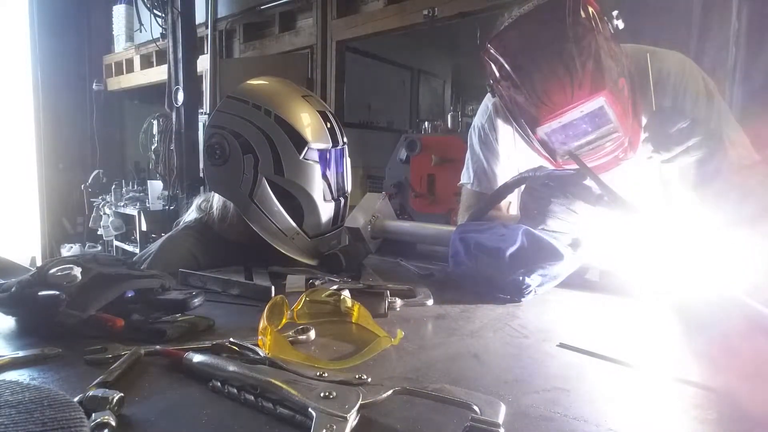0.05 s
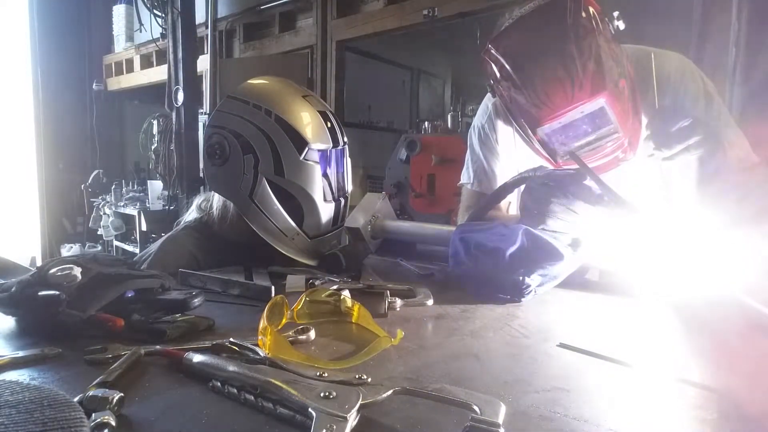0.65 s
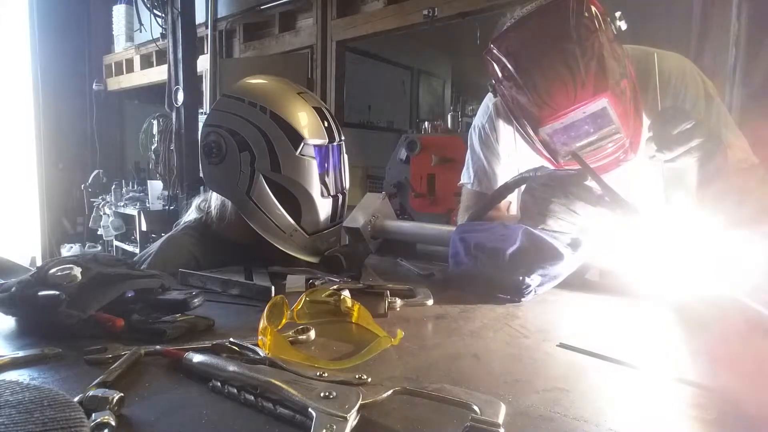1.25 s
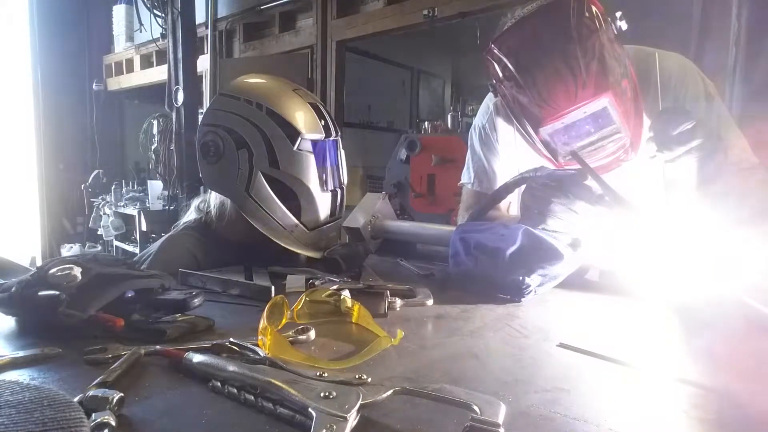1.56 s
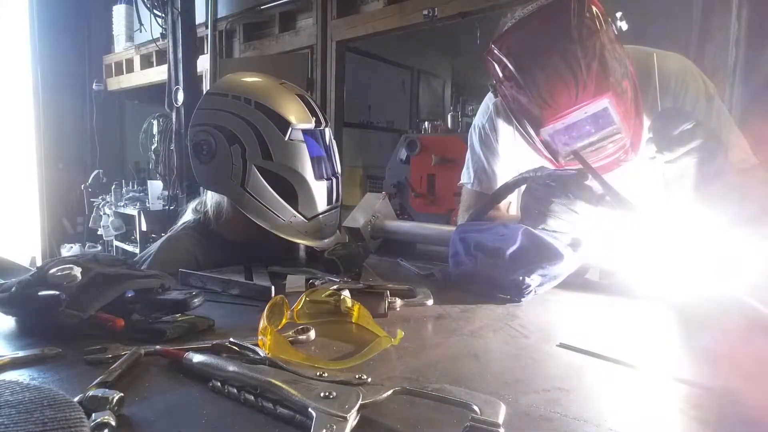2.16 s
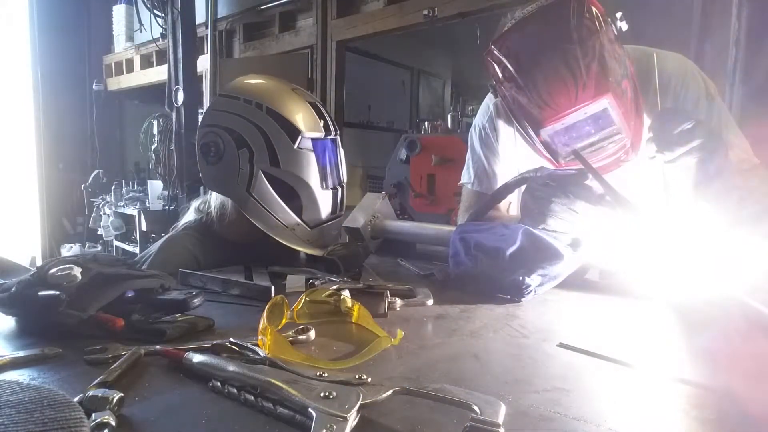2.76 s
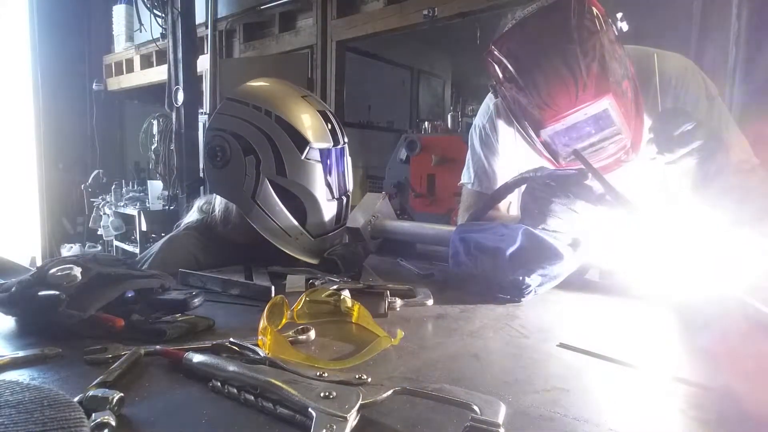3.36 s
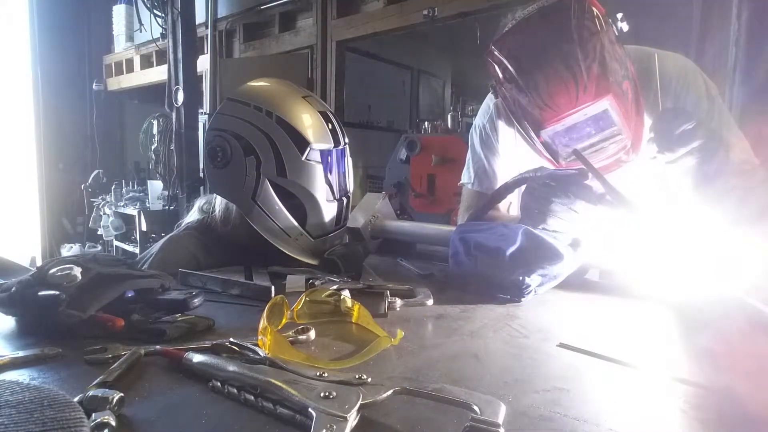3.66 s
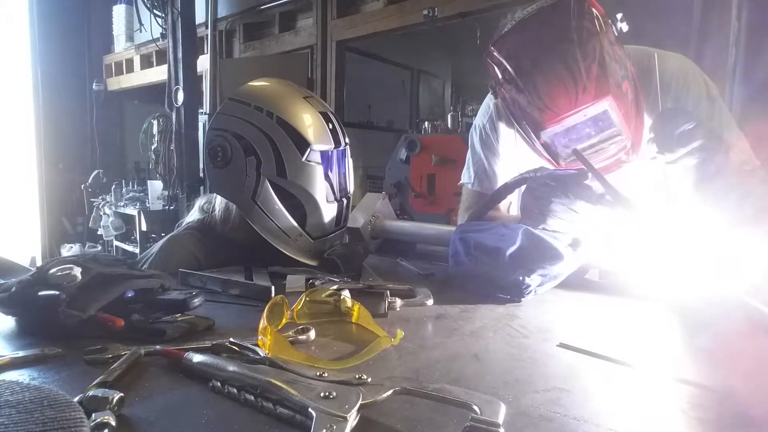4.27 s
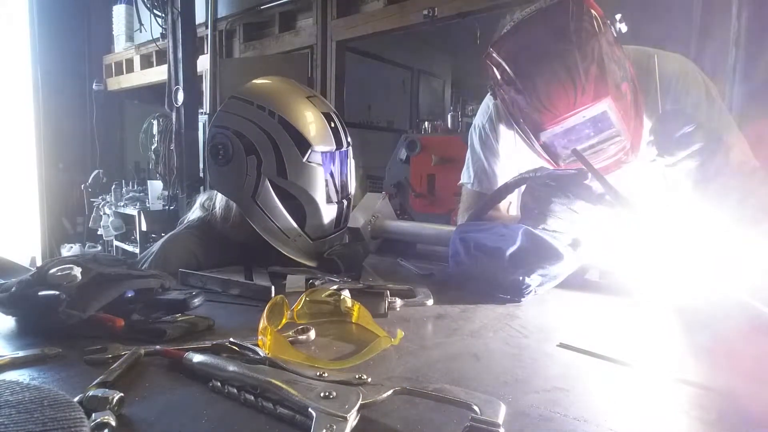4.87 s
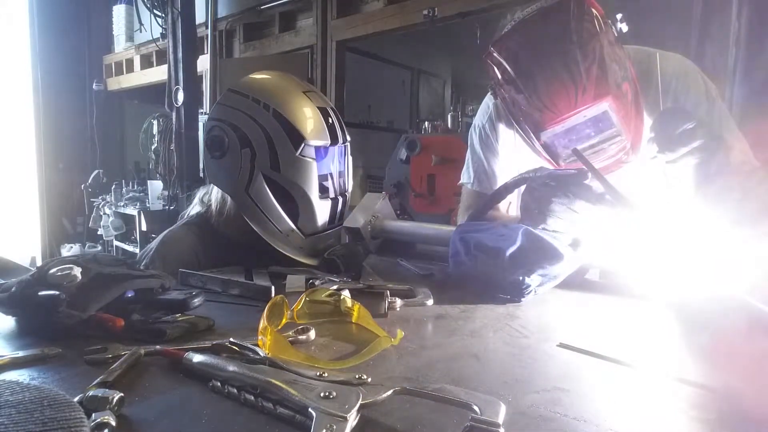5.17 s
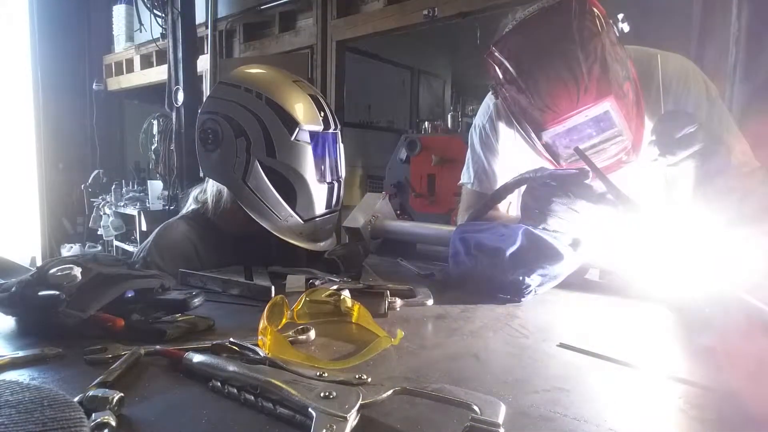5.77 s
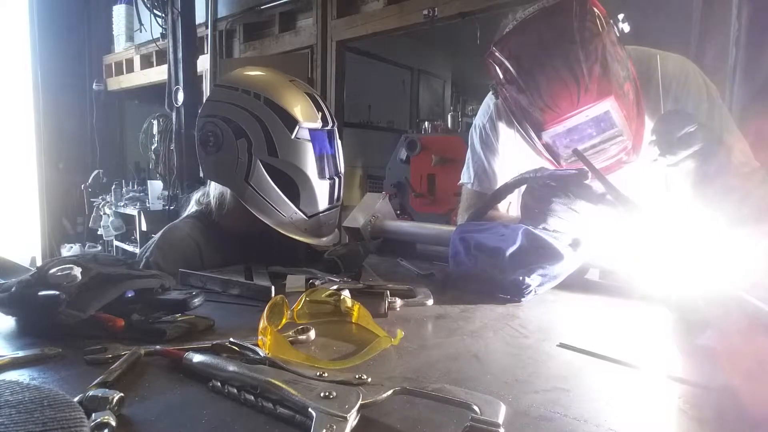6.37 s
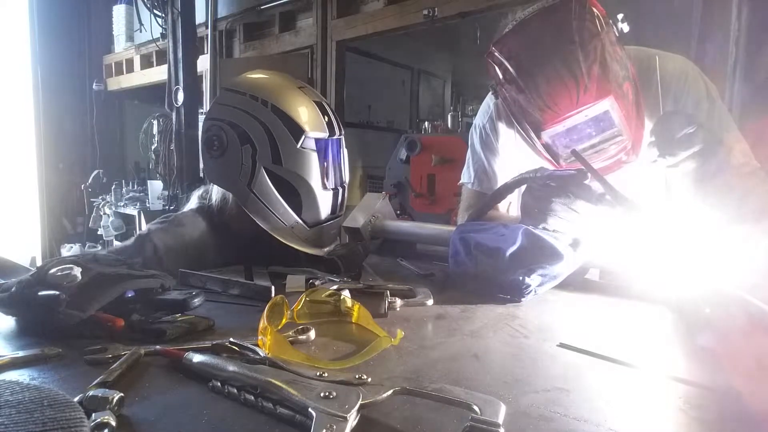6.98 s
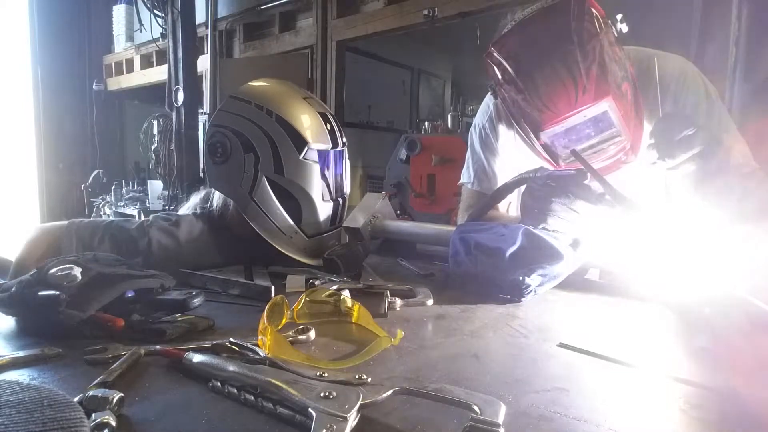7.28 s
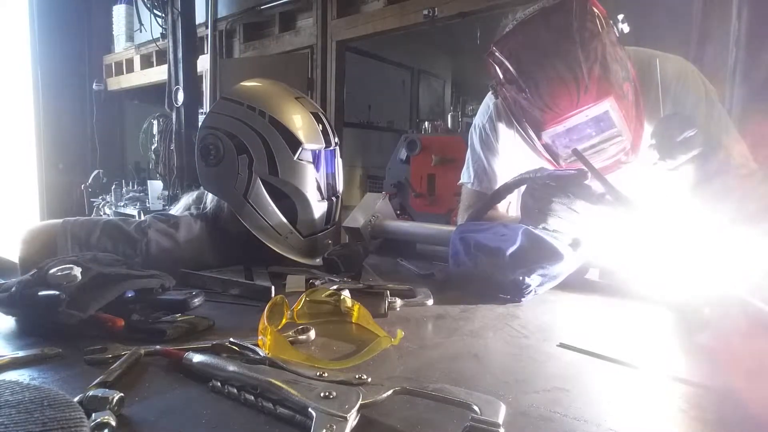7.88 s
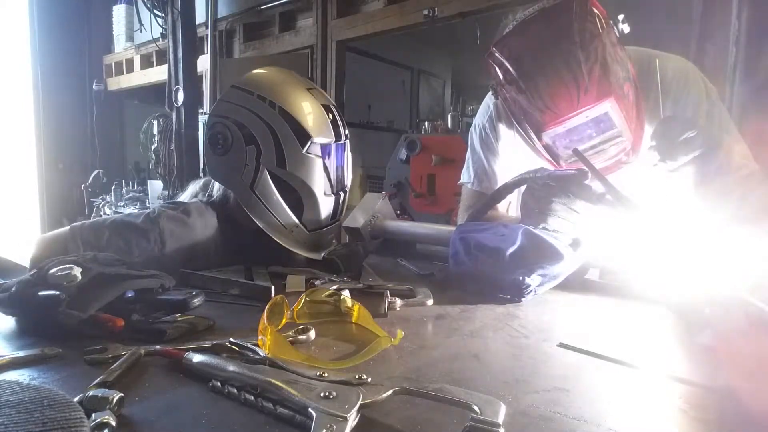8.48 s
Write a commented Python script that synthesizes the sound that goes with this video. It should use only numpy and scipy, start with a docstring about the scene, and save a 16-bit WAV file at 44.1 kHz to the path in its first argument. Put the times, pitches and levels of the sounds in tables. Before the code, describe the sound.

Close, continuous arc welding on a steel bench: a hard crackling buzz with hiss, small pops and a thin metallic whine.

```python
"""A hard, snapping buzz: an AC TIG arc on a steel workshop bench, close to a small stereo microphone.
Twice in every mains cycle a volley of starter sparks snaps and the arc relights with a puff; between
the two the oxide skin sizzles. The arc rasps when drawn long and sputters over dirty patches, and the
sparks set the workpiece whining. Echoes off the bench and the room shift as the torch creeps along.
Behind it the welder hums, a fan drones and the bench takes two soft knocks."""
import sys
import numpy as np
from scipy import signal
from scipy.fft import rfft, irfft, next_fast_len
from scipy.io import wavfile

SR = 44100
rng = np.random.default_rng(int(sys.argv[2]) if len(sys.argv) > 2 else 0)


def dump(signal):
    """Clip the signal to [-1, 1] and save it as 16-bit WAV at the path in sys.argv[1]."""
    limited = np.clip(np.atleast_2d(signal).T, -1, 1)
    pcm = np.round(limited * 32767).astype(np.int16)
    wavfile.write(sys.argv[1], SR, pcm)


N = 375732
TIME = np.arange(N) / SR
SIZE = next_fast_len(N + SR // 4, real=True)
HZ = np.fft.rfftfreq(SIZE, 1 / SR)
MAINS_HZ, CLEANING_MS = 60.009, 6.33  # each cycle cleans the metal this long, then heats it


def from_db(db):
    """Decibels to gain."""
    return 10 ** (np.asarray(db) / 20)


def rms_one(x):
    """Scale to rms 1."""
    return x / np.sqrt(np.mean(np.abs(x) ** 2) + 1e-20)


def read(rows, at):
    """Each column of a table, joined by straight lines."""
    key, *columns = np.transpose(rows)
    return [np.interp(at, key, c) for c in columns]


def spectrum(points):
    """A table joined on a log-frequency axis."""
    hz, value = np.transpose(points)
    return np.interp(np.log(HZ + 1), np.log(hz), value)


def spells(rows, at, ease_s=0.063):
    """Each row's amounts hold from its start to its end, easing in and out."""
    start, end, *amounts = np.transpose(rows)
    inside = np.minimum(at[:, None] - start, end - at[:, None])
    return [np.clip(.5 + inside / ease_s, 0, 1) @ amount for amount in amounts]


def shaped(x, response):
    """Pass a sound through a frequency response."""
    return irfft(rfft(x, SIZE) * response, SIZE)[..., :N]


def colour(x, db):
    """Causal (minimum-phase) filter with this dB curve, keeping the power of white noise."""
    cepstrum = irfft(np.log(rms_one(from_db(db))), SIZE)
    cepstrum[1:SIZE // 2] *= 2
    cepstrum[SIZE // 2 + 1:] = 0
    return shaped(x, np.exp(rfft(cepstrum)))


def resonance(hz, width_hz):
    """Frequency response of one ringing mode, gain 1 on top."""
    return 1 / (1 + 2j * (HZ - hz) / width_hz)


def clicks(seconds, db, size=8):
    """Clicks placed between the samples."""
    out, at = np.zeros(N), seconds[:, None] * SR
    taps = np.floor(at).astype(int) + np.arange(1 - size, size + 1)
    pulses = from_db(db)[:, None] * np.sinc(taps - at) * np.sinc((taps - at) / size)
    np.add.at(out, np.clip(taps, 0, N - 1), pulses)
    return out


def delay_line(x, oversample=4):
    """Gives a function that plays the sound a fixed or changing number of ms late."""
    fine = oversample * irfft(rfft(x, SIZE), oversample * SIZE)
    seconds = np.arange(len(fine)) / (oversample * SR)
    return lambda ms: np.interp(TIME - ms / 1000, seconds, fine)


# Room tone of the workshop. Each row: frequency in Hz, relative level in dB.
AIR_SPECTRUM = [(20, -19), (55, 1), (90, 0.5), (130, -8), (220, 2), (400, -6), (1000, -6), (4000, 6.5),
                (16000, -36)]

def shop_air():
    """A low murmur of air all around the microphone, partly shared by both sides."""
    noise = rng.standard_normal(N) + 2.2 * rng.standard_normal((2, N))
    return from_db(-40.5) * rms_one(colour(noise, spectrum(AIR_SPECTRUM)))


# The fan behind the arc. Each row: time in seconds, level in dB, blade tone in Hz.
FAN_DRONE = [(0, -57, 156.3), (.3, -52, 158), (1.1, -58, 157.7), (1.4, -51, 158.5), (2.9, -52.5, 151.7),
             (3.6, -53.5, 147.4), (4.6, -60.5, 149.6), (8.5, -63.5, 147.5)]

def fan(flutter_db=-5.5, width_hz=49):
    """Turbulence shakes the level and phase of the blade tone into a narrow drone."""
    level_db, blade_hz = read(FAN_DRONE, TIME)
    phase = 2 * np.pi * np.cumsum(blade_hz) / SR
    turbulence = shaped(rng.standard_normal((2, N)), 1 / (1 + (HZ / width_hz) ** 2))
    swell, sway = from_db(flutter_db) * rms_one(turbulence)
    return from_db(level_db) * rms_one((1 + swell) * np.sin(phase) + sway * np.cos(phase))


# The welder in the background. Each row: frequency in Hz, level in dB.
HUM_PARTIALS = [(60, -76), (120, -60.5), (180, -68)]

def transformer_hum():
    """The transformer hums at the first harmonics of the mains."""
    return sum(from_db(db) * np.sqrt(2) * np.sin(2 * np.pi * (hz * TIME + rng.random()))
               for hz, db in HUM_PARTIALS)


# Knocks on the bench. Each row: start in seconds, level in dB, pitch in Hz, seconds to fall 60 dB.
KNOCKS = [(5.164, -35, 260, .018), (7.498, -28, 105, .023)]

def knock(start, db, hz, t60):
    """A soft, dull knock that dies within a few swings."""
    age = np.maximum(TIME - start, 0)
    attack = 1 - np.exp(-age / 0.00033)
    return from_db(db - 60 * age / t60) * np.cos(2 * np.pi * hz * age) * attack


def reflections(x, t60, onset_s, forms=4):
    """A dense dying cloud of echoes; its pattern fades from form to form as the torch moves."""
    age, out = np.arange(SR // 4) / SR, 0
    for k in range(forms):
        cloud = rng.standard_normal(len(age)) * from_db(-60 * age / t60) * (age > onset_s)
        echoes = signal.oaconvolve(x, cloud / np.linalg.norm(cloud))[:N]
        nearness = np.clip(1 - np.abs(TIME / TIME[-1] * (forms - 1) - k), 0, 1)
        out = out + np.sin(nearness * np.pi / 2) * echoes
    return out


# Colour of the room from the bench. Each row: frequency in Hz, gain in dB.
ROOM_COLOUR = [(100, -13.5), (800, -9), (1400, -8.5), (2600, -0.5), (3300, -1), (4100, -4.5), (5200, -4.5),
               (7000, -2.5), (16000, -13.5)]

def room(x, glancing):
    """Quick scatter of the glancing sound off nearby things, then the workshop's tail."""
    scatter = from_db(-4.5) * reflections(glancing, t60=0.02, onset_s=0.0022)
    tail = from_db(-3) * reflections(x, t60=0.62, onset_s=0.012)
    return shaped(scatter + tail, from_db(spectrum(ROOM_COLOUR)))


# Echoes off the workpiece and the tools around it.
# Each row: delay in ms, level in dB, share of the torch's shift.
TOOL_ECHOES = [(0.463, -8.7, 0.14), (0.676, -16.9, 0.95), (0.866, -14.1, 1.2), (1.014, -19.8, 0.82),
               (1.098, -14.9, 0.98), (1.185, -12.7, 0.67), (1.291, -11.3, 1.07), (1.396, -9.5, 1.18),
               (1.511, -13.7, 1.37), (1.56, -14.8, 0.68), (1.759, -14.7, 0.47), (1.799, -14.2, 0.22),
               (2.006, -17.8, -0.69), (2.044, -20.6, -0.89), (2.454, -16.9, -0.04), (2.934, -19.8, 0.06),
               (5.844, -21.9, -0.03)]

def bench_echoes(x, sooner_ms, low_cut_hz=3240):
    """The bench top answers first; the small things on it throw back only the treble."""
    top = shaped(x, np.exp(-2j * np.pi * HZ * .267 / 1000))  # .267 ms late
    delayed = delay_line(x)
    tools = sum(from_db(db) * delayed(ms - share * sooner_ms) for ms, db, share in TOOL_ECHOES)
    treble = shaped(tools, 1j * HZ / (low_cut_hz + 1j * HZ))
    return from_db(-18) * top + from_db(-1.5) * treble


# The microphone's right side against its left, for close sound. Each row: frequency in Hz, gain in dB.
RIGHT_SHADE = [(60, -11), (300, -32), (560, -4), (1000, -5.5), (1450, 1), (2000, -15), (2400, 3),
               (3200, -6.5), (4100, -12.5), (5100, -12), (7400, -13), (8800, -3), (11200, -19.5),
               (16000, -23)]
# The same for the room sound. Each row: frequency in Hz, gain in dB.
RIGHT_ROOM = [(100, 22), (1000, -7.5), (2400, 2.5), (3200, 3.5), (4200, -4), (6000, 4.5), (7400, -12.5),
              (9500, 2), (11200, -0.5), (16000, 3)]
# How far the right side trails. Each row: frequency in Hz, lag in radians.
RIGHT_LAG = [(0, .4), (500, .75), (1150, 1.65), (1600, 2.8), (2300, 3.13), (3000, 3.17), (4400, 3.7),
             (6000, 7.3), (8000, 6.8), (9300, 10.8), (11200, 12.7), (13000, 13.3), (16000, 20)]
# How alike the room is on both sides. Each row: frequency in Hz, likeness from 0 to 1.
ROOM_LIKENESS = [(100, .6), (1000, .8), (2300, .9), (3000, .99), (4500, .1), (16000, .05)]

def microphone(near, room_left, room_other):
    """Two ports close to the arc; the right one is shaded, late and hears a partly different room."""
    late = np.exp(-1j * read(RIGHT_LAG, HZ)[0])
    alike = np.clip(spectrum(ROOM_LIKENESS), 0, 1)
    diffuse = shaped(room_left, alike * late) + shaped(room_other, np.sqrt(1 - alike ** 2))
    room_right = shaped(diffuse, from_db(spectrum(RIGHT_ROOM)))
    near_right = shaped(near, from_db(spectrum(RIGHT_SHADE)) * late)
    return np.array([near + room_left, near_right + room_right])


# The torch's shift along the seam. Each row: time in seconds, shortening of the echo path in ms.
TORCH_SHIFT = [(0, 0), (1, .003), (2, .002), (3, .016), (4, .038), (5.5, .052), (7, .055), (8.5, .051)]

def workshop(x, whine):
    """Arc, whine and echoes meet at the microphone; most close echoes come sooner as the torch moves."""
    sooner_ms, = read(TORCH_SHIFT, TIME)
    near = x + whine + bench_echoes(x, sooner_ms)
    glancing = delay_line(x)(-sooner_ms)
    return microphone(near, room(x, glancing), room(x, glancing))


# The whine dips once, then grows along the seam. Each row: time in seconds, gain in dB.
WHINE_GAIN = [(0, 6), (2.2, -24), (2.8, 3.5), (5.2, 10), (5.6, 8), (7.5, 13), (8.5, 10)]

def workpiece_whine(snap):
    """The sparks ring a narrow mode of the workpiece and a lower, broader one."""
    modes = resonance(5998, width_hz=65) + from_db(-1.5) * resonance(4020, width_hz=136)
    return from_db(read(WHINE_GAIN, TIME)[0]) * shaped(snap, modes)


# The arc as the hand guides the torch. Each row: time in seconds, strength in dB.
ARC_POWER = [(0.1, -25.5), (0.4, -25.5), (1.35, -26), (1.81, -23.5), (2.6, -23.5), (3.01, -23.5),
             (5.0, -23.5), (5.3, -24.5), (6.09, -23), (7.38, -23.5), (8.07, -25.5), (8.4, -25)]

def strength(at):
    """Strength of the arc in dB about its mean."""
    db, = read(ARC_POWER, at)
    return db - db.mean()


def relights(relight_ms=1.89, sooner_ms_per_db=0.035):
    """Start times of the cleaning and the heating half-cycles; a stronger arc relights sooner."""
    cycle = np.arange(0, TIME[-1], 1 / MAINS_HZ)
    cleaning = cycle + (relight_ms - sooner_ms_per_db * strength(cycle)) / 1000
    return cleaning, cleaning + CLEANING_MS / 1000


# The arc settles in the warm pool. Each row: time in seconds, spread between cycles in dB.
ARC_UNREST = [(0, 3.3), (.9, 3.1), (1.4, 1.9), (2.8, 1.8), (3.6, 1.6), (5.4, 1.5), (6.2, 2), (7.4, 1),
              (8.2, 0.5)]

def waver(starts):
    """Chance change in dB of each cycle, as large as the arc is unsteady."""
    return read(ARC_UNREST, starts)[0] * rng.standard_normal(len(starts))


def accents(rows, starts):
    """Extra dB for each cycle: every row lands on the cycle nearest its time."""
    db = np.zeros(len(starts))
    for seconds, extra_db in rows:
        db[np.argmin(np.abs(starts - seconds))] += extra_db
    return db


# Dirt on the seam, which trades puff for sizzle.
# Each row: start and end in seconds, extra sizzle in dB, loss of the cleaning puff in dB.
DIRTY_PATCHES = [(.19, .3, 9.5, 1), (1.28, 1.6, 1, 5.5), (2.35, 2.92, 5, 6.5), (3.28, 3.46, 1.5, 3),
                 (8.03, 8.3, 1.5, 0)]
# One pop. Each row: frequency in Hz, relative level in dB.
POP_SPECTRUM = [(60, -28), (300, -19), (500, 20), (700, -15), (900, 0), (1300, 8), (1600, -8), (4000, -10),
                (16000, -28)]

def pops(cleaning, clean_per_s=3, level_db=-16.5, uneven_db=2.5):
    """Specks of dirt burst in the cleaning half-cycle, more often and louder on the dirty patches."""
    chance, moment = rng.random((2, len(cleaning)))
    _, dirt_db = spells(DIRTY_PATCHES, cleaning)
    pop_db = level_db + 0.9 * dirt_db + uneven_db * rng.standard_normal(len(cleaning))
    bursts = chance < clean_per_s / MAINS_HZ * from_db(2.4 * dirt_db)
    seconds = cleaning + np.sqrt(moment) * CLEANING_MS / 1000
    return colour(clicks(seconds[bursts], pop_db[bursts]), spectrum(POP_SPECTRUM))


# The oxide skin along the seam. Each row: time in seconds, relative level of its sizzle in dB.
OXIDE_LEVEL = [(0, -43), (.6, -49.5), (1.05, -39.5), (2.9, -44), (3.7, -45), (4.7, -40), (5.2, -47),
               (6.1, -45), (8.5, -46.5)]
# The sizzle from close by. Each row: frequency in Hz, relative level in dB.
SIZZLE_SPECTRUM = [(60, -23.5), (280, -17), (500, -1), (800, -4), (1200, -2.5), (1700, 0.5), (2600, 0.5),
                   (6000, 1), (12000, -4), (16000, -4)]

def sizzle(cleaning, heating, spots_per_s=5000, uneven_db=1.5, rise_ms=2.6):
    """Tiny arc spots burst the oxide skin as the current builds, only in the cleaning half-cycle."""
    sputter_db, _ = spells(DIRTY_PATCHES, cleaning)
    level_db = read(OXIDE_LEVEL, cleaning)[0] + sputter_db
    gain = from_db(level_db + uneven_db * rng.standard_normal(len(cleaning)))
    spots = (rng.random(N) < spots_per_s / SR) * rng.choice([-1, 1], N)
    sizes = from_db(-1.5 * np.minimum(rng.exponential(1, N), 4))
    cycle = np.maximum(np.searchsorted(cleaning, TIME) - 1, 0)
    rise = np.clip((TIME - cleaning[cycle]) * 1000 / rise_ms, 0, 1)
    current = np.sin(np.pi / 2 * rise) ** 2 * (TIME < heating[cycle])
    fry = rms_one(spots * sizes) * gain[cycle] * current
    return from_db(17.5) * colour(fry, spectrum(SIZZLE_SPECTRUM))


# The arc is drawn long and rasps. Each row: start and end in seconds, gain of the cleaning puff in dB.
LONG_ARCS = [(.17, .29, 7), (.65, 1.14, 8), (7.3, 7.52, 1.5)]
HEATING_LOSS = 0.65  # share of that gain which the heating half-cycle loses
# The rasp falls away. Each row: start and end in seconds, loss of both puffs in dB.
QUIET_SPELLS = [(.33, .64, 3), (5.13, 5.42, 0.5)]
# Cleaning halves that end in a spit. Each row: time in seconds, gain of the closing puff in dB.
CLOSING_SPITS = [(1.275, 9), (1.425, 1), (2.358, 13), (2.408, -3), (2.441, 7), (2.474, 8), (2.525, 9.5),
                 (2.591, 2), (2.705, 7), (2.755, 13), (2.807, 11), (2.874, 4)]
# One puff from close by. Each row: frequency in Hz, relative level in dB.
PUFF_SPECTRUM = [(40, -26), (170, -8), (300, -5.5), (420, 0), (560, 3.5), (900, 1), (1200, 4), (1500, 4),
                 (2000, 5), (2600, 3.5), (4000, 5), (12000, -17)]

def puffs(cleaning, heating, lead_ms=.22, drop_ms=6.25, warming_db_per_s=0.23):
    """Hot gas swells at the cleaning relight and shrinks as power drops, more so as the metal warms."""
    _, dirt_db = spells(DIRTY_PATCHES, cleaning)
    flare_db, = spells(LONG_ARCS, cleaning)
    lull_db, = spells(QUIET_SPELLS, cleaning)
    drive_db = 1.46 * strength(cleaning) + warming_db_per_s * (cleaning - cleaning.mean()) - lull_db
    swell_db = -25.5 + drive_db + flare_db - dirt_db + 0.55 * accents(HARD_SNAPS, cleaning)
    shrink_db = -31.5 + drive_db - HEATING_LOSS * flare_db + accents(CLOSING_SPITS, heating)
    drops = cleaning + drop_ms / 1000
    # a puff starts with the first sparks, just ahead of the main one
    swell = clicks(cleaning - lead_ms / 1000, swell_db + waver(cleaning))
    shrink = clicks(drops - lead_ms / 1000, shrink_db + waver(drops))
    return from_db(17.5) * colour(swell - shrink, spectrum(PUFF_SPECTRUM))


# The sparks of one volley. Each row: time from the relight in ms, relative level in dB.
VOLLEY_SPARKS = [(-.404, -7.5), (-.21, -10), (0, 3), (0.139, -14.5)]

def volleys(starts, level_db, unrest, jitter_ms, scatter_db):
    """Each relight is a volley of sparks; those far from the main one keep time less well."""
    volley_db = level_db + unrest * waver(starts)
    out = 0
    for ms, db in VOLLEY_SPARKS:
        slip, weakness = rng.standard_normal((2, len(starts)))
        offset_ms = ms + jitter_ms * (1 + 2 * abs(ms)) * slip
        out = out + clicks(starts + offset_ms / 1000, volley_db + db - scatter_db * weakness)
    return out


# Relights that snap harder, or stumble. Each row: time in seconds, gain of the volley in dB.
HARD_SNAPS = [(.385, -4), (.701, 3.5), (.752, 2), (1.118, 2.5), (1.218, 3.5), (1.285, 7), (1.535, 6),
              (1.618, 6), (1.685, 4), (1.718, 5), (1.951, 2.5), (2.068, 3), (2.201, 3), (3.368, -4),
              (3.418, 4.5), (4.251, 4), (5.085, 3), (5.168, 3.5), (5.485, 5), (5.568, -3), (8.251, 3.5)]
# One spark from close by. Each row: frequency in Hz, relative level in dB.
SPARK_SPECTRUM = [(100, -38.5), (1200, -10), (2400, -21.5), (3100, -3.5), (3600, 3.5), (4050, 3.5),
                  (4600, -0.5), (5400, 3), (6000, 6), (6500, 7.5), (7400, 7), (8400, 6), (10000, 3.5),
                  (11300, 3), (12700, 9), (13700, -2.5), (14800, 1), (16000, -5)]

def starter_sparks(cleaning, heating):
    """A volley opens each half-cycle; dirt weakens the cleaning one and a long arc favours it."""
    power_db = strength(cleaning)
    _, dirt_db = spells(DIRTY_PATCHES, cleaning)
    flare_db, = spells(LONG_ARCS, cleaning)
    cleaning_db = -11 + power_db - 0.42 * dirt_db + .12 * flare_db + accents(HARD_SNAPS, cleaning)
    heating_db = -14 + power_db - HEATING_LOSS * flare_db
    first = volleys(cleaning, cleaning_db, unrest=0.78, jitter_ms=0.0069, scatter_db=0.74)
    second = volleys(heating, heating_db, unrest=0.59, jitter_ms=0.013, scatter_db=0.84)
    return from_db(13.5) * colour(first + second, spectrum(SPARK_SPECTRUM))


# Narrow peaks and dips that make single harmonics of the buzz stand out or fade.
# Each row: frequency in Hz, width in Hz, relative gain in dB.
BUZZ_PEAKS = [(400, 90, 3), (770, 50, -2.5), (880, 90, 9), (1220, 110, 6.5), (1380, 50, 3), (1680, 44, 7.5),
              (1860, 44, 6), (1980, 50, 4.5), (2480, 110, 8), (2640, 40, 5), (2820, 50, 5), (3200, 170, -5),
              (3430, 70, 5), (3900, 45, 7), (4080, 55, 5.5), (4320, 90, -5), (4870, 70, 4), (5250, 200, -2),
              (7380, 330, 5), (8520, 60, 3.5), (11230, 320, 6)]

def arc():
    """The buzz of sparks, puffs, sizzle and pops, with narrow peaks and dips, and the sparks' whine."""
    cleaning, heating = relights()
    snap = starter_sparks(cleaning, heating)
    buzz = snap + puffs(cleaning, heating) + sizzle(cleaning, heating) + pops(cleaning)
    peaks_db = sum(db / (1 + (2 * (HZ - hz) / width) ** 2) for hz, width, db in BUZZ_PEAKS)
    return colour(buzz, peaks_db), workpiece_whine(snap)


def scene():
    """The arc close to the microphone, with the background a little to the left."""
    welding = workshop(*arc())
    background = transformer_hum() + fan() + shop_air() + sum(knock(*row) for row in KNOCKS)
    return welding + background * from_db([[1.4], [-1.4]])


def record(dry):
    """The highest peaks are rounded off softly, and the recorder cuts the top of the treble."""
    ceiling, cutoff_hz = .86, 15900
    rounded = dry / (1 + (dry / ceiling) ** 6) ** (1 / 6)
    return shaped(rounded, 1 / np.sqrt(1 + (HZ / cutoff_hz) ** 300))


dry = scene()
out = record(dry)
dump(out)
```